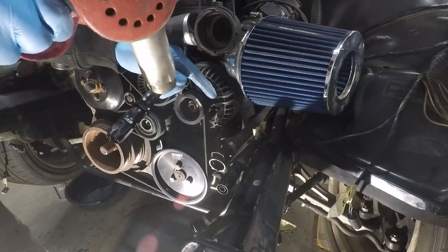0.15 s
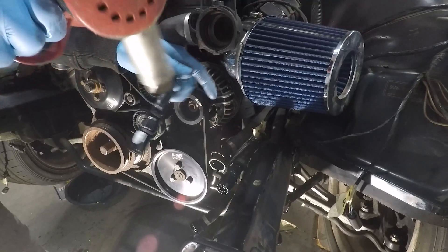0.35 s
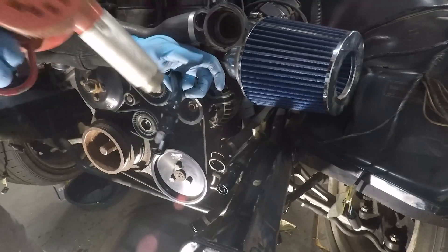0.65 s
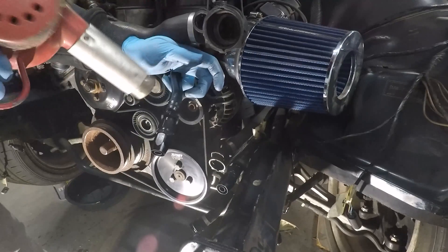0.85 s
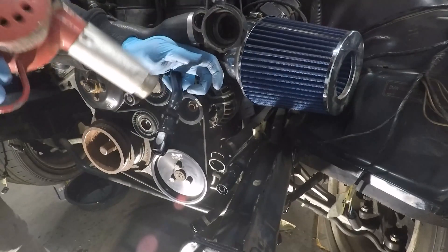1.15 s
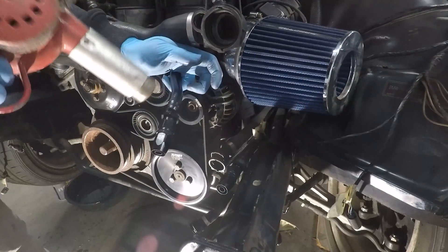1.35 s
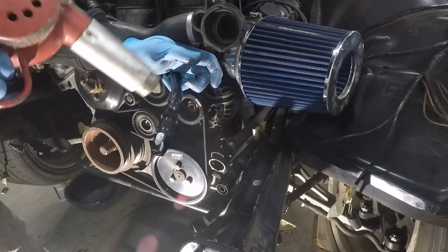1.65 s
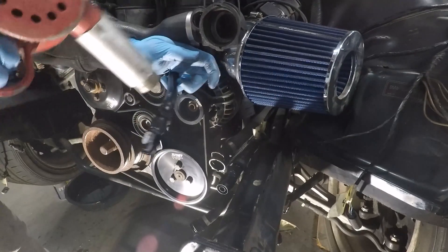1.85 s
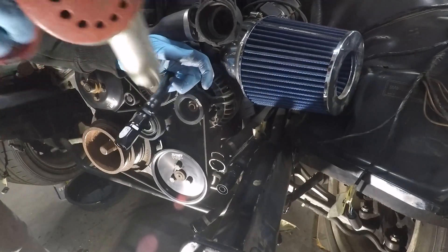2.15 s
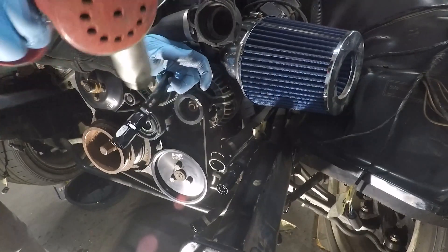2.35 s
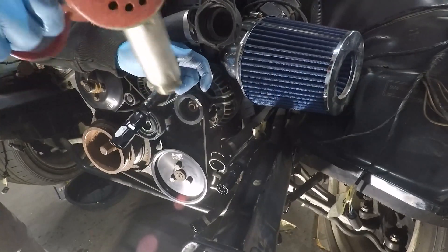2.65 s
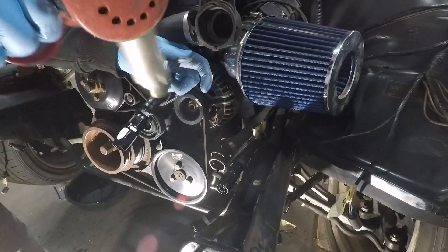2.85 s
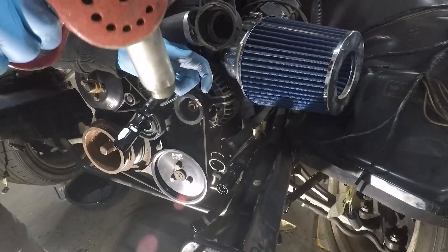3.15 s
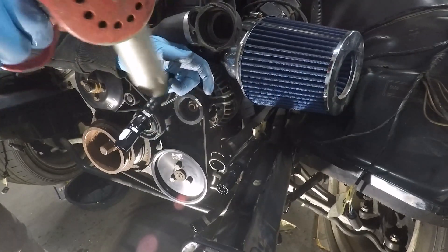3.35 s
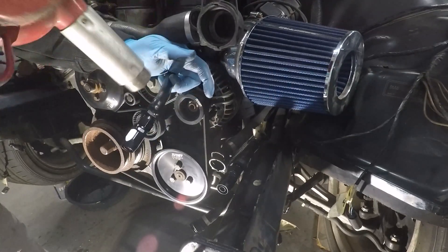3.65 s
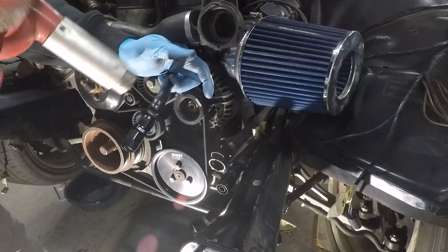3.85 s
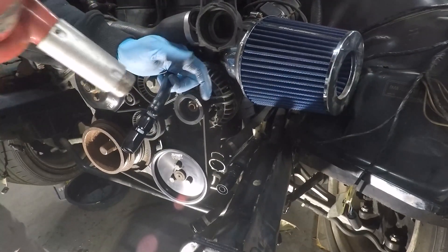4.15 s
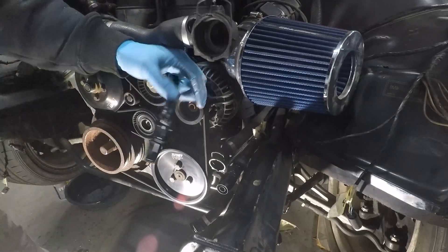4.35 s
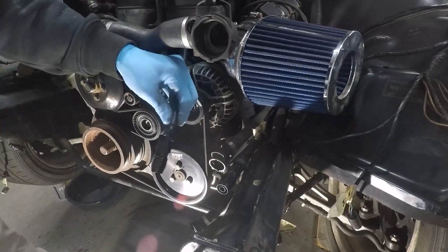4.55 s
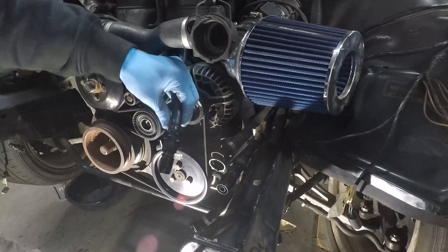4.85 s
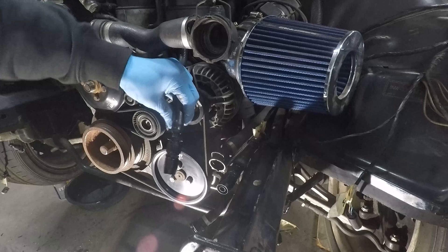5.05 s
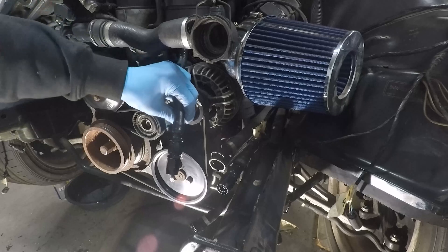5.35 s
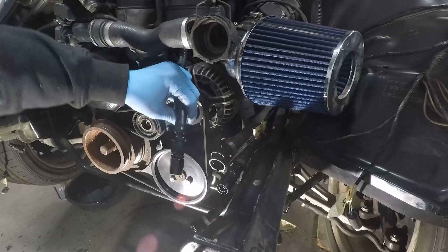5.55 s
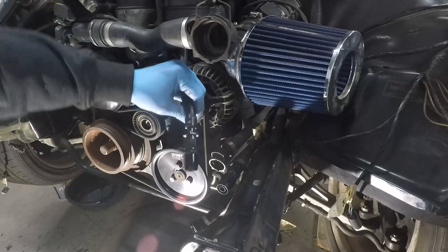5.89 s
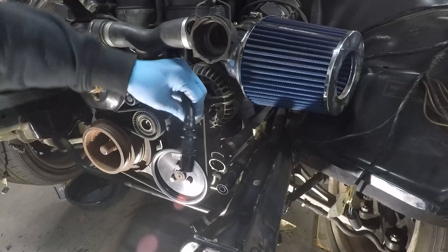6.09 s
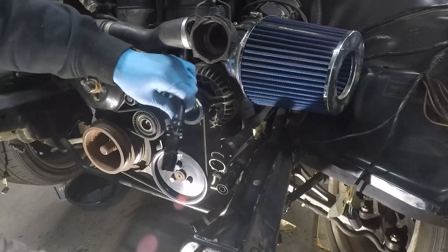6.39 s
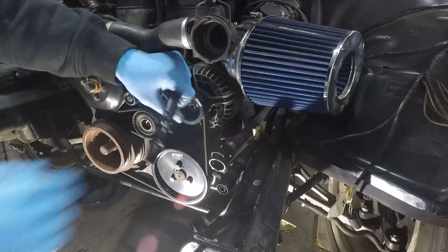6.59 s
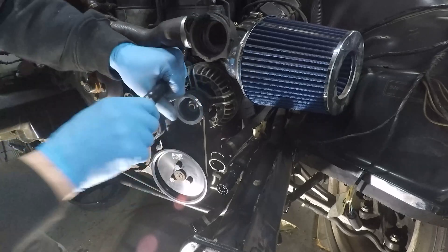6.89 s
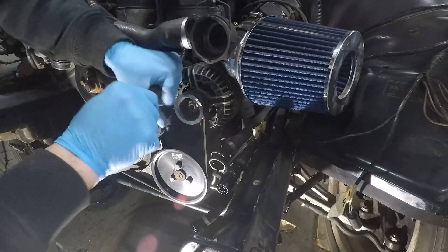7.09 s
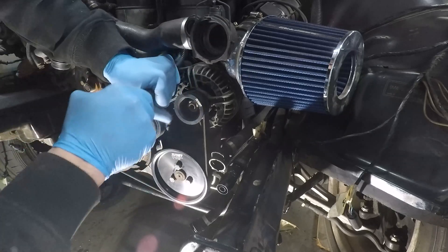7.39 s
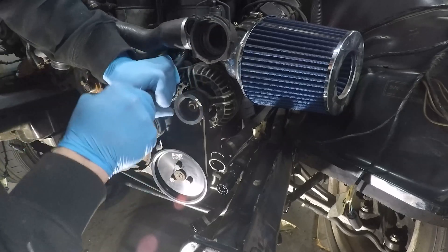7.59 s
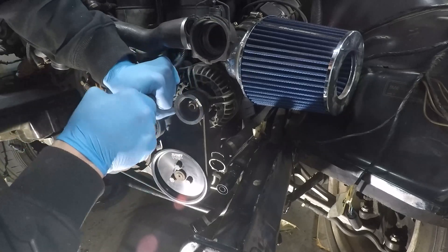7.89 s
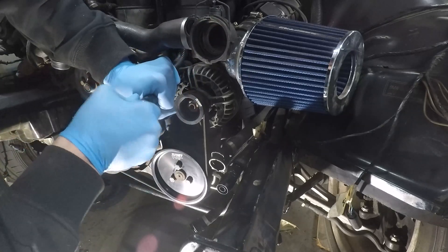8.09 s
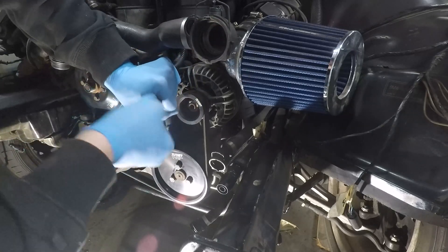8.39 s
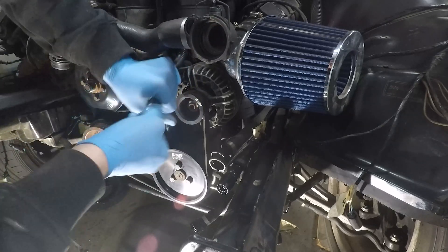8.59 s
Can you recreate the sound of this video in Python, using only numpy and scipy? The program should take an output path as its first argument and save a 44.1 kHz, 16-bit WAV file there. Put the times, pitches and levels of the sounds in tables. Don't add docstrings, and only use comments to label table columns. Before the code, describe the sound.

A heat gun runs throughout, close to a phone microphone in a garage: broad airy hiss with hollow nozzle tones over a motor hum near 220 Hz. From 0 to 0.7 s it is loud with low wind swells, a strong one at 0.6. From 0.8 to 2.1 s dense, distorted gusts thump the microphone and the blower sinks far back. It stays quiet at first, then climbs to full loudness by about 3.3 s. A violent gust at 3.7-3.9 s pushes it down again, with smaller thumps until 4.6. As the gun swings away, the hiss thins and shifts, with brief breathy whistles and a tick at 5.2. Two hard clacks on concrete follow at 5.8 and 5.87 s, with metallic ringing, short scraping rattle and room tail. The blower then runs steadily, slowly rising, with light irregular metallic ticks from 6.6 s and a soft knock at 8.7.

```python
import sys
import numpy as np
from scipy import signal
from scipy.fft import rfft, irfft, next_fast_len
from scipy.io import wavfile
from scipy.ndimage import uniform_filter1d

SR = 44100
rng = np.random.default_rng(int(sys.argv[2]) if len(sys.argv) > 2 else 0)


def output_pcm(signal):
    pcm = np.clip(np.atleast_2d(signal).T, -1, 1) * 32767
    wavfile.write(sys.argv[1], SR, np.round(pcm).astype(np.int16))


def makeup_ratio(level_db):
    decades = np.asarray(level_db, float) / 20
    return 10 ** decades


N = 384993
T = np.arange(N) / SR

# frequency [Hz], level [dB], t60 [s].
STAND_MODES = [(4600, -3, .03), (6420, -2, .04), (7600, -3, .03), (8100, -1, .04), (9030, 1, .04),
               (10600, 1, .04), (11100, -3, .03), (12200, -3, .03), (13000, -4, .03), (13750, 0, .04),
               (14900, -4, .03)]


def shape(points, hz, peaks=()):
    f, db = np.transpose(points)
    out = np.interp(np.log(hz + 1), np.log(f), db)
    for centre, width, lift in peaks:
        out = out + lift / (1 + (2 * (hz - centre) / width) ** 2)
    return makeup_ratio(out)


def unit(x):
    return x / np.sqrt(np.mean(x ** 2))


def coloured(points, size):
    spectrum = rfft(rng.standard_normal(size))
    return unit(irfft(spectrum * shape(points, np.fft.rfftfreq(size, 1 / SR)), size))


def smooth_steps(count, k):
    steps = np.repeat(rng.standard_normal(count), k)[:N]
    return uniform_filter1d(uniform_filter1d(steps, k), k)


def walk(rate):
    k = int(SR / rate)
    return unit(smooth_steps(N // k + 1, k))


def lowpass(x, hz, order):
    return signal.sosfilt(signal.butter(order, hz, fs=SR, output="sos"), x)


def band(x, lo_hz, hi_hz, order=2):
    edges = [lo_hz, min(hi_hz, .45 * SR)]
    return signal.sosfilt(signal.butter(order, edges, "band", fs=SR, output="sos"), x)


def ring(modes, t, gains=1):
    f, db, t60 = np.transpose(modes)[:, :, None]
    sines = np.sin(2 * np.pi * (f * t + rng.random(f.shape)))
    return np.sum(gains * makeup_ratio(db - 60 * t / t60) * sines, axis=0)


def add(out, s, x):
    i = int(s * SR)
    out[i:i + len(x)] += x[:len(out) - i]


def gun():
    # time [s], hiss [dB].
    gain_ride = [(0, -25.5), (.77, -27.5), (.79, -31.5), (.97, -38.5), (1.051, -47), (1.15, -48.5),
                 (1.3, -46.5), (1.95, -44.5), (2.13, -52), (3.26, -30), (3.69, -31.5), (3.76, -31.5),
                 (3.925, -37), (3.945, -45), (4.11, -49), (4.41, -45.5), (4.49, -53), (4.75, -51)]
    # frequency [Hz], density [dB per Hz].
    held_colour = [(76, -7), (130, -6), (220, -11.5), (300, -8.5), (450, -6.5), (1300, -7), (1950, -12.5),
                   (2900, -13.5), (4700, -23), (6500, -24.5), (8900, -25.5), (9500, -32.5), (11500, -37.5),
                   (15400, -41.5)]
    # frequency [Hz], width [Hz], lift [dB].
    held_peaks = [(626, 190, 3), (1085, 180, 6), (1596, 390, 7), (2807, 350, 7), (4080, 390, 8.5),
                  (5140, 380, 3), (6110, 98, 6.5), (8260, 520, 4.5), (12970, 3100, 8.5)]
    # frequency [Hz], density [dB per Hz].
    stood_colour = [(35, -50), (60, -33), (130, -20.5), (215, -13), (290, -17), (540, -14), (810, -9.5),
                    (1170, -6), (1510, -8), (3400, -16.5), (5950, -22.5), (6600, -23), (9000, -26),
                    (15400, -35)]
    # frequency [Hz], width [Hz], lift [dB].
    stood_peaks = [(783, 14, 8), (1145, 46, 7.5), (1375, 6.7, 13.5), (1981, 20, 10.5), (2528, 76, 6.5),
                   (3920, 21, 9), (5830, 550, 6)]
    orders_db = [-1, -17.5, -12.5]
    turn_start_s, turn_end_s = 4.08, 4.92
    shaft_hz, hum_db = 221.3, -6

    settle_s = np.maximum(T - gain_ride[-1][0], 0)
    db = np.interp(T, *np.transpose(gain_ride)) + 7 * (1 - np.exp(-settle_s / 0.82))
    down = np.clip((T - turn_start_s) / (turn_end_s - turn_start_s), 0, 1)

    away = np.clip((T - 3.95) / 0.076, 0, 1)
    held = jet(held_colour, held_peaks, treble_db=3, low_db=1 - 2 * away)
    stood = jet(stood_colour, stood_peaks, treble_db=4, low_db=3.5)
    hiss = np.sqrt(1 - down) * held + np.sqrt(down) * stood + hollows()

    speed_hz = shaft_hz * (1 + .009 * walk(5) + 0.01202 * walk(25))
    angle = 2 * np.pi * np.cumsum(speed_hz) / SR
    hum = sum(makeup_ratio(order_db) * np.sin((k + 1) * angle) for k, order_db in enumerate(orders_db))
    hum = hum * makeup_ratio(hum_db + 1.3 * walk(1.6) + 2.5 * walk(11))
    return makeup_ratio(db) * (hiss + np.sqrt(2) * hum), db


def jet(points, peaks, treble_db, low_db):
    size = next_fast_len(N)
    hz = np.fft.rfftfreq(size, 1 / SR)
    air = rfft(rng.standard_normal(size)) * shape(points, hz, peaks)
    air = air / np.sqrt(np.mean(irfft(air * (hz > 900) * (hz < 4500), size) ** 2))
    out = 0
    for centre in 90 * 2. ** np.arange(0, 8, .5):
        part = np.clip(1 - 2 * np.abs(np.log2((hz + 1) / centre)), 0, 1)
        aim_db = treble_db * np.clip(np.log2(centre / 2800), 0, 1) + low_db * (centre < 800)
        out = out + irfft(air * part, size)[:N] * makeup_ratio(aim_db + 0.44 * walk(8))
    return out


def hollows():
    # start [s], end [s], frequency [Hz], width [Hz], level above the hiss [dB].
    whistles = [(.8, 2.1, 2050, 120, -12), (.9, 2.1, 1130, 90, -8), (3.93, 4.45, 2030, 120, -12),
                (3.93, 4.45, 1130, 90, -7), (4.68, 5.05, 1690, 160, -3), (4.93, 5.1, 1175, 120, -7),
                (5.19, 5.33, 1160, 90, -3), (4.85, 5.8, 2875, 110, -8), (4.75, 5.45, 6375, 500, -12),
                (5.0, 5.72, 5550, 500, -10), (5.95, 6.35, 165, 14, -13), (5.95, 7.2, 990, 50, -13),
                (5.9, 7.6, 1170, 45, -9), (7.0, 8.73, 1162, 40, -8), (5.6, 7.0, 602, 40, -15)]
    out = np.zeros(N)
    for start, end, hz, width_hz, db in whistles:
        along = np.linspace(0, 1, int((end - start) * SR))
        sag_hz = 40 * (hz < 200)
        angle = 2 * np.pi * np.cumsum(hz - sag_hz * along) / SR
        flutter = lowpass(rng.standard_normal((2, SR * 2)), width_hz / 2, 2)[:, -len(along):]
        whistle = unit(flutter[0] * np.sin(angle) + flutter[1] * np.cos(angle))
        add(out, start, makeup_ratio(db) * np.sin(np.pi * along) ** .5 * whistle)
    return out


def draught():
    # time [s], level of small eddies [dB].
    rumble = [(0, -35.5), (.7, -36), (2.05, -28.5), (2.2, -49), (2.6, -47.5), (3.0, -37.5), (3.6, -36.5),
              (3.95, -41), (4.45, -43), (4.75, -52), (5.6, -60), (6.3, -65), (7.1, -57), (8.73, -56)]
    # time [s], suction [full scale], width [ms].
    swells = [(.1824, 0.15, 17), (.3807, 0.39, 26), (.4688, 0.56, 23), (0.492, -0.24, 8.7),
              (.5927, -1.16, 13), (0.617, 0.37, 18), (0.6905, 0.36, 8.4), (0.756, 0.43, 15),
              (0.9042, 0.63, 16.4), (0.986, 0.8, 13), (1.2998, 0.69, 10), (1.349, 0.78, 13.4),
              (1.372, 0.77, 13), (1.421, 0.26, 35), (1.491, 0.81, 12), (1.515, .53, 14), (1.603, 0.66, 21),
              (1.68, 0.5, 16), (1.786, 0.22, 16), (1.8737, 0.73, 8.1), (1.9072, 0.71, 13),
              (1.968, 0.26, 25), (2.016, 0.49, 10.8), (2.1053, 0.16, 14), (2.767, 0.13, 12),
              (3.5, 0.14, 22), (3.704, 0.4, 17), (3.7297, 1.59, 10.8), (4.424, 0.28, 17),
              (4.605, 0.107, 19)]
    # time [s], suction [full scale], width [ms].
    sharp = [(0.7797, 2.42, 7.2), (0.8177, .84, 3.3), (0.8878, 0.45, 1.9), (0.9051, 1.1, 2.2),
             (.948, .56, 4.4), (0.9881, 1.22, 1.2), (1.0098, 0.52, 2.9), (1.1422, 0.33, 6.3),
             (1.2347, 0.54, 6.4), (1.2798, 0.59, 9), (1.362, 0.8, 7.5), (1.5902, 0.65, 3.8),
             (1.6574, .48, 8.7), (1.781, 0.64, 5.2), (1.804, 0.83, 4.9), (1.9136, 0.88, 6.7),
             (1.9464, 0.49, 3.1), (3.742, 0.82, 1.4), (3.7808, 0.58, 0.98), (3.7898, 1.14, 4.8),
             (3.795, 1.18, 0.78), (3.8312, .65, 4), (3.877, 0.88, 8.6), (3.894, 0.38, 11),
             (4.161, 0.28, 4.3), (4.2977, 0.33, 4.3), (4.308, 0.48, 7.4), (4.3182, 0.56, 5.7),
             (4.363, 0.31, 9.9), (4.3873, 0.39, 7.2)]
    # time [s], height [full scale].
    lulls = [(1.212, 0.078), (1.252, 0.14), (1.32, 0.14), (1.39, .15), (1.535, 0.058), (1.703, 0.12),
             (1.85, 0.25), (1.935, 0.18), (3.912, 0.1), (.84, 0.081), (.93, 0.1)]

    suck, puff = np.zeros(N), np.zeros(N)
    pushes = [(s, -height, 13) for s, height in lulls]
    for s, depth, width_ms in swells + sharp + lesser_eddies() + pushes:
        near = slice(max(int((s - .08) * SR), 0), int((s + .08) * SR))
        eddy = depth * np.exp(-np.abs((T[near] - s) / (.72e-3 * width_ms)) ** 1.6)
        suck[near] = np.maximum(suck[near], eddy)
        puff[near] = np.minimum(puff[near], eddy)
    pull = signal.sosfiltfilt(signal.butter(3, 400, fs=SR, output="sos"), suck + puff)

    def lag(x, hz):
        return signal.lfilter(*signal.butter(1, hz, fs=SR), x)

    limited = np.minimum(pull, 1)
    push = 0.99 * lag(limited, 3) - 0.5 * lag(limited, 0.09)
    pull = pull - 0.14 * lag(pull, 12)

    strength = makeup_ratio(np.interp(T, *np.transpose(rumble)))
    still_db = -5 * np.clip(T - 4.7, 0, 1)
    small = unit(band(rng.standard_normal(N), 13, 50.6, order=3))
    small = small * strength * makeup_ratio(3.0 * walk(9.2) + still_db)
    sway = (makeup_ratio(10.5) * walk(9) + makeup_ratio(3.0) * walk(24.04)) * strength
    ragged = unit(band(rng.standard_normal(N), 137, 350, order=3))
    ragged = ragged * makeup_ratio(-25) * np.clip(pull, 0, 1) ** 1.91
    return push + sway - pull + small, ragged


def lesser_eddies():
    # start [s], end [s], usual depth [full scale], usual width [ms].
    gusts = [(0.505, .6, 0.32, 18), (0.794, .92, 0.36, 1.8), (0.939, 1.04, 0.35, 2.1),
             (1.109, 1.2, 0.2, 4.6), (1.26, 1.3, 0.48, 2.8), (1.329, 1.375, 0.62, 4.4),
             (1.406, 1.52, 0.34, 5), (1.56, 1.69, 0.37, 4), (1.712, 1.74, 0.24, 4.6),
             (1.769, 1.835, 0.32, 3.5), (1.865, 1.92, 0.4, 4), (1.946, 2.035, 0.24, 2.5),
             (3.75, 3.902, 0.38, 2.8), (1.826, 1.842, 0.43, 8.1), (1.742, 1.757, .3, 6.6),
             (3.915, 3.934, 0.19, 6.3), (3.985, 4.002, .04, 4.5), (2.043, 2.08, 0.14, 4)]
    per_s = 62
    rows = []
    for start, end, depth, width_ms in gusts:
        luck = rng.random((16, 3))
        times = start + (np.arange(len(luck)) + luck[:, 0]) / per_s
        depths = depth * (.5 + luck[:, 1])
        widths = width_ms * 3 ** (luck[:, 2] - .5)
        rows += [row for row in zip(times, depths, widths) if row[0] < end]
    return rows


def clacks():
    # time [s], peak level [dB].
    blows = [
        (5.8012, -14.5),
        (5.8702, -8.8),
        (8.7225, -27),
    ]
    # frequency [Hz], level [dB], t60 [s].
    stand = [(1170, -10, 0.11), (1860, 7, 0.0072), (4540, -1, 0.072), (6430, -2.5, 0.25), (7800, -7, 0.22),
             (9060, -9, 0.4), (10260, -30, 0.25), (11070, -23, 0.11), (13000, -27, 0.25),
             (13750, -24, 0.41)]
    # frequency [Hz], level [dB], t60 [s].
    housing = [(945, -1.5, 0.18), (1880, -7, 0.2), (2420, -8, 0.15), (3530, -20, 0.72), (5700, -7, 0.14),
               (7020, -7, 0.093), (7700, -10, 0.18), (9100, -17, 0.42), (10290, -53, 0.51),
               (13670, -30, 0.22)]
    # frequency [Hz], density [dB per Hz].
    colours = [
        [(88, -47), (150, -18), (411, -23), (509, -5.5), (1170, -2), (1290, -4), (5730, -2.5), (6570, -7),
         (15400, -19)],
        [(88, -23), (150, -22.5), (550, -9.5), (927, -4), (1260, -9.5), (2490, -11.5), (2690, -15.5),
         (8960, -21), (15400, -44)],
    ]

    out, t = np.zeros(N), T[:SR]
    kinds = [(stand, colours[0], .22), (housing, colours[1], .28), (housing, colours[1], .28)]
    for (s, db), (modes, colour, crack_s) in zip(blows, kinds):
        crack = coloured(colour, SR) * (makeup_ratio(-13 - 60 * t / crack_s) + makeup_ratio(-16 - 60 * t / .03))
        tail = coloured(colour, SR) * makeup_ratio(-22 - 60 * t / 1.12) * (1 - np.exp(-t / 0.0056))
        add(out, s, makeup_ratio(db) * (crack + tail + makeup_ratio(-13) * ring(modes, t)))
    return out


def rocking():
    # start [s], length [s], level [dB].
    contacts = [
        (5.799, 0.063, -33),
        (5.863, 0.057, -32),
        (5.977, .03, -44),
        (6.075, .14, -41.5),
    ]
    attack_s, sag_db_per_s, release_db_per_s = 0.0079, 106, 400

    rung, out, t = 0, np.zeros(N), T[:SR // 2]
    for hz, db, t60 in STAND_MODES:
        swell_db = 4 * smooth_steps(40, 735)[:len(t)]
        mode = band(rng.standard_normal(len(t)), hz - 2.5 / t60, hz + 2.5 / t60, order=1)
        rung = rung + makeup_ratio(db + swell_db) * unit(mode)
    scrape = unit(band(rng.standard_normal(len(t)), 4700, 15000))

    first_s, contact = contacts[0][0], 0
    for s, length, db in contacts:
        since = np.maximum(t + first_s - s, 0)
        fall_db = sag_db_per_s * since + release_db_per_s * np.maximum(since - length, 0)
        contact = np.maximum(contact, np.minimum(since / attack_s, 1) * makeup_ratio(db - fall_db))
    add(out, first_s, contact * (unit(rung) + makeup_ratio(-6) * scrape))
    return out


def ticks():
    # time [s], peak level [dB].
    taps = [(5.188, -31), (5.442, -43), (6.6258, -38), (6.768, -36), (6.7774, -35), (6.833, -36),
            (6.8937, -36), (7.0434, -37), (7.1294, -40), (7.276, -36), (7.3911, -35), (7.6585, -40),
            (7.7767, -35.5), (7.891, -41), (7.9284, -39), (8.0441, -36), (8.2394, -39), (8.308, -36),
            (8.4257, -36), (8.5435, -38), (8.6956, -39), (8.7214, -45)]
    out, t = np.zeros(N), T[:SR // 8]
    for s, db in taps:
        burst = rng.standard_normal(len(t)) * makeup_ratio(-60 * t / 0.033) * (1 - np.exp(-t / 0.00054))
        mix = makeup_ratio(2.5 * rng.standard_normal((len(STAND_MODES), 1)) - 36)
        modes = signal.fftconvolve(burst, ring(STAND_MODES, t, mix))[:len(t)]
        add(out, s, makeup_ratio(db) * (modes + makeup_ratio(-5.5) * band(burst, 1500, 15000)))
    return out


def scene():
    sound, db = gun()
    wind, ragged = draught()
    push_top = .45
    wind = np.where(wind > 0, push_top * np.tanh(wind / push_top), wind)
    headroom_db = np.maximum(db + 35, 0)
    limit = .43 * makeup_ratio(2.0 * headroom_db)
    slope = np.clip(1 - wind / limit, .11, 1.45) ** 1.1
    return (wind + slope * (ragged + sound) + clacks() + rocking() + ticks())[None]


def band_limit(x):
    return signal.sosfilt(signal.butter(12, 15560, fs=SR, output="sos"), x)


def record(dry):
    top = .97
    return band_limit(dry / (1 + np.abs(dry / top) ** 8) ** (1 / 8))


dry = scene()
out = record(dry)
output_pcm(out)
```